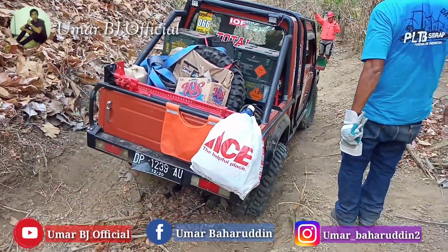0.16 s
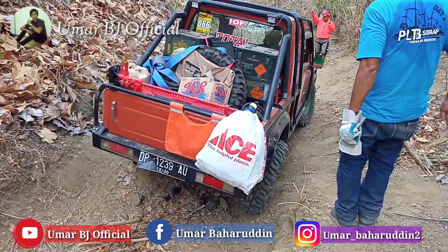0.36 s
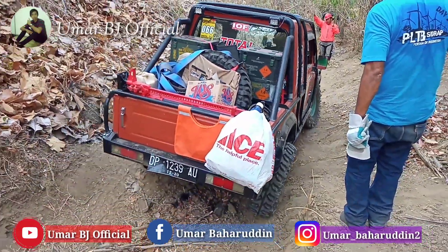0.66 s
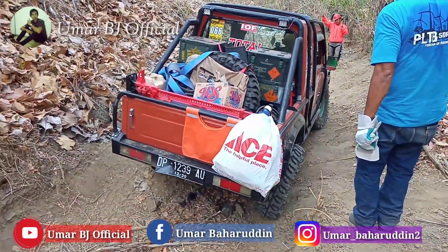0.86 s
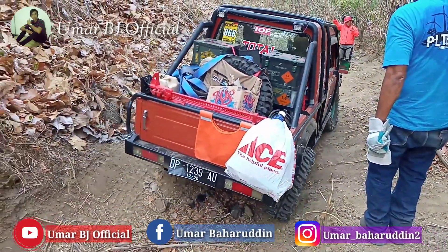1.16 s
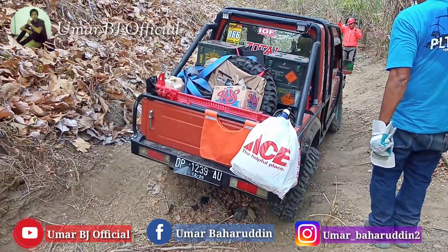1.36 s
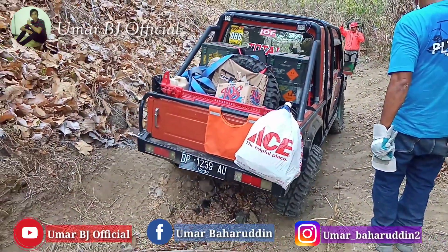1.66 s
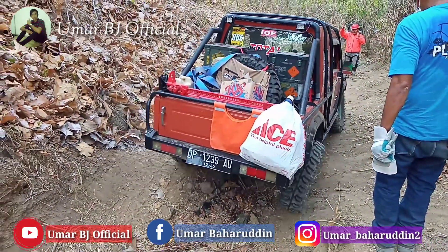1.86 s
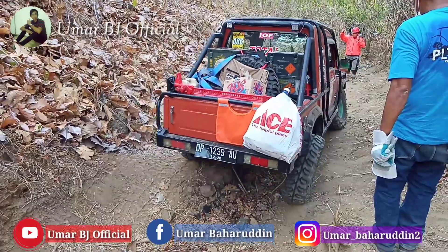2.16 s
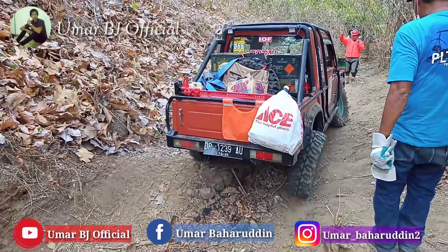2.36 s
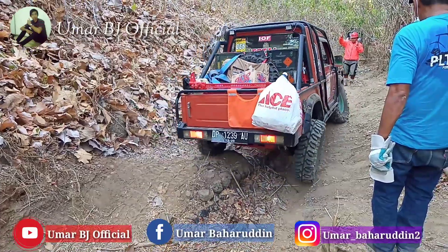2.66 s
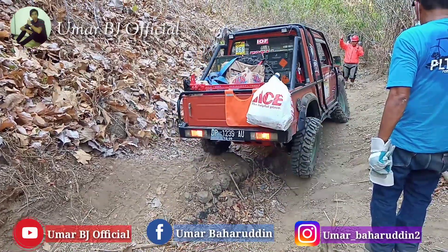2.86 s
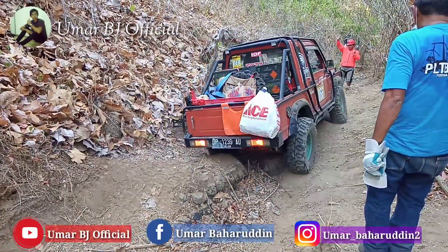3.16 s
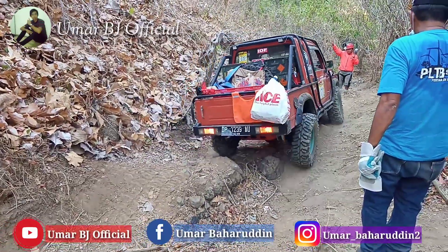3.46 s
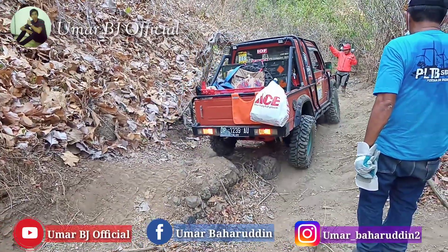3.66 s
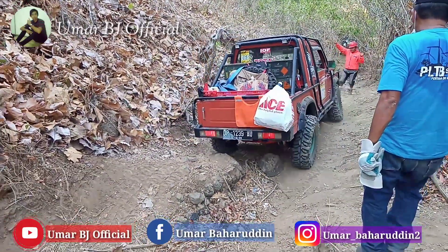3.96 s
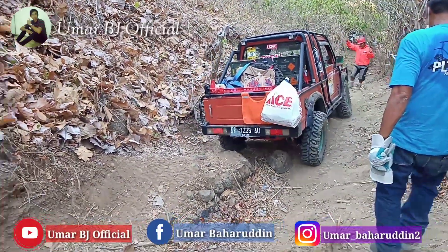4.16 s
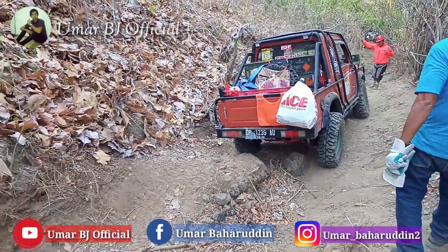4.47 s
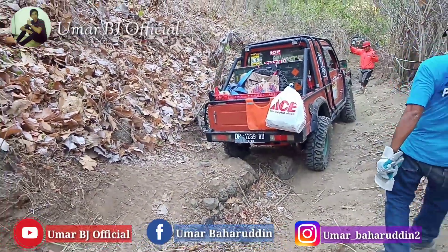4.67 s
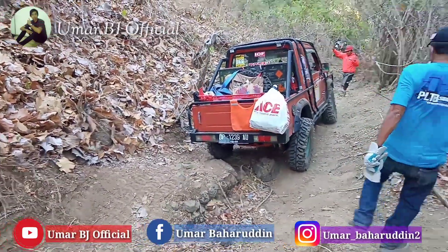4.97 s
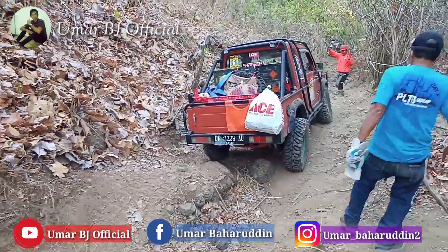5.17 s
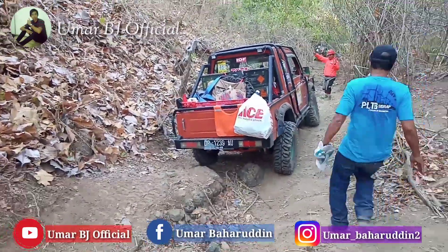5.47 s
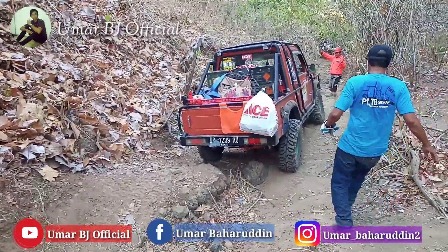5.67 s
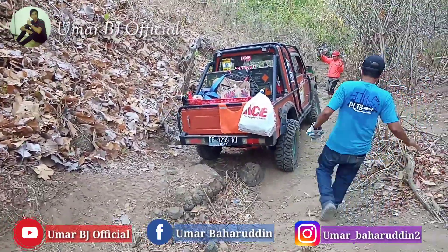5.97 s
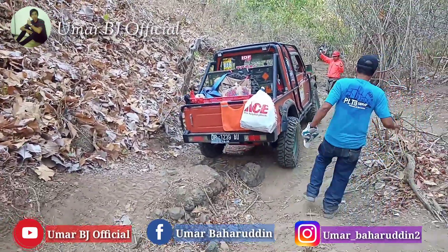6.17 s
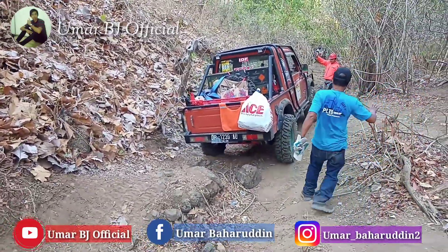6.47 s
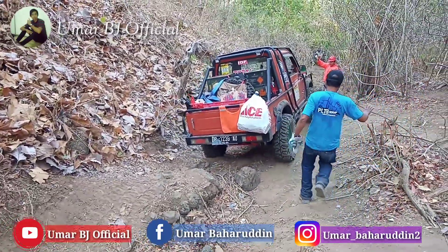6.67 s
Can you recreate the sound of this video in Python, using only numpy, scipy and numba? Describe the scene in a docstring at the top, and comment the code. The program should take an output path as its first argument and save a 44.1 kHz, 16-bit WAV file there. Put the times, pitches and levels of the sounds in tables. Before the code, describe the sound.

A small four-wheel-drive climbs a rocky dirt track, heard from a few metres behind. Its engine revs in a long surge with a booming, barking, slightly raspy exhaust. It then sinks to a labouring near-idle as the drivetrain gives a quick run of hard knocks and stones crack under the tyres. A few exhaust coughs lead into a second surge, a little farther away, which eases near the end.

```python
"""Off-roader on a rocky climb

A small four-cylinder climbs a dirt track, heard in mono from a few metres behind, beside a bank.
The throttle opens in two long surges: the exhaust booms in low tones, the firings ring the tailpipe
into a bark, and gas jets rasp. Between the surges the engine labours near idle, slack in the
drivetrain slams shut in a run of hard knocks, and stones crack under the tyres."""
import sys
import numpy as np
from scipy import signal
from scipy.fft import rfft, irfft
from scipy.io import wavfile
from scipy.ndimage import uniform_filter1d
from numba import njit

SR = 44100
rng = np.random.default_rng(int(sys.argv[2]) if len(sys.argv) > 2 else 0)


def dump(signal):
    """Clip the signal to [-1, 1] and save it as 16-bit WAV at the path in sys.argv[1]."""
    limited = np.clip(np.atleast_2d(signal).T, -1, 1)
    pcm = np.round(limited * 32767).astype(np.int16)
    wavfile.write(sys.argv[1], SR, pcm)


N = 300881
TIME = np.arange(N) / SR


def from_db(db):
    return 10 ** (np.asarray(db) / 20)


def rms_one(x):
    return x / np.sqrt(np.mean(x ** 2) + 1e-20)


def in_time(rows):
    """A two-column curve, read at every sample."""
    return np.interp(TIME, *np.transpose(rows))


def evened(x, size=5000):
    """Running level held at 1, so that an envelope can set it."""
    return x / np.sqrt(uniform_filter1d(uniform_filter1d(x ** 2, size), size) + 1e-12)


def filtered(x, order, hz, kind="low"):
    return signal.sosfilt(signal.butter(order, hz, kind, fs=SR, output="sos"), x)


def delayed(x, lag_s):
    return np.interp(TIME - lag_s, TIME, x, left=0)


def clicks(times, heights):
    """Single impulses at given moments."""
    samples = np.round(np.asarray(times) * SR).astype(int)
    return np.bincount(np.clip(samples, 0, N - 1), heights, N)


def fade(hits, decay_s):
    """Envelope that jumps at each hit and dies away."""
    return signal.lfilter([1], [1, -np.exp(-1 / (decay_s * SR))], hits + 1e-18)


def lagged(x, lag_s):
    """A control that follows its input with some inertia."""
    return x[0] + (1 - np.exp(-1 / (lag_s * SR))) * fade(x - x[0], lag_s)


def drift(rate_hz, step=40):
    """Smooth random wander of spread 1."""
    r = np.exp(-2 * np.pi * step * rate_hz / SR)
    slow = signal.lfilter([1], [1, -2 * r, r * r], rng.standard_normal(N // step + 2002))[2000:]
    return np.interp(np.arange(N) / step, np.arange(len(slow)), rms_one(slow))


def noise(spectrum, envelope=1, size=4096):
    """White noise under an envelope, coloured by a causal filter that keeps its level."""
    hz, db = np.transpose(spectrum)
    grid = np.maximum(np.fft.rfftfreq(size, 1 / SR), 1)
    gain = from_db(np.interp(np.log(grid), np.log(hz), db))
    cepstrum = irfft(np.log(gain))
    response = irfft(np.exp(rfft(2 * cepstrum[:size // 2], size)))
    white = envelope * rng.standard_normal(N)
    return signal.fftconvolve(white, response / np.linalg.norm(response))[:N]


def resonate(x, hz, width_hz):
    """A resonance with gain 1 at its peak."""
    r = np.exp(-np.pi * width_hz / SR)
    poles = [1, -2 * r * np.cos(2 * np.pi * hz / SR), r * r]
    return signal.lfilter(np.array([1, 0, -1]) * (1 - r * r) / 2, poles, x + 1e-18)


@njit
def moving_resonance(x, hz, width_hz):
    """Two-pole resonance whose pitch may change at every sample."""
    r = np.exp(-np.pi * width_hz / SR)
    turn = 2 * np.pi * hz / SR
    y = np.zeros(len(x))
    for i in range(2, len(x)):
        y[i] = x[i] - x[i - 2] + 2 * r * np.cos(turn[i]) * y[i - 1] - r * r * y[i - 2]
    return y


def ringing(drive, modes):
    """Parallel resonances of alternating sign, at level 1."""
    return evened(sum((-1) ** k * from_db(db) * resonate(drive, hz, width)
                      for k, (hz, width, db) in enumerate(modes)))


def swell(hits, hz, rise_s):
    """Each hit starts a swing that builds up and dies away."""
    t = TIME[:SR // 4]
    age = (t / rise_s) ** 2
    return signal.fftconvolve(hits, age * np.exp(1 - age) * np.sin(2 * np.pi * hz * t))[:N]


def puffs(pulses, rough, puff_s):
    """Each firing trails a short turbulent puff."""
    return pulses + rough * fade(pulses, puff_s) * rng.standard_normal(N)


def bank_echoes(x, echo_db=-12.5, dull_hz=3000):
    """The direct sound reaches the microphone, then three dull echoes from the bank by the track."""
    dull = filtered(x, 1, dull_hz)
    return x + from_db(echo_db) * sum(delayed(dull, lag_s) for lag_s in (.0073, .0168, .029))


# Colour of hard contact, for stones and drivetrain alike: frequency_hz, level_db
CONTACT_COLOUR = [(30, -38), (200, 20.5), (450, 4.5), (900, 1.5), (1450, 1), (2100, -8), (2900, -5.5),
                  (3800, -5.5), (4300, -15.5), (5300, -31), (6400, -27), (8400, -40), (10500, -53.5),
                  (15500, -60)]
# Grit shifting on the track as the tyres creep: time_s, level_db
GRIT_LEVEL = [(0, -62), (2.0, -57), (2.5, -49), (2.9, -47), (3.3, -44), (3.7, -50), (4.2, -62)]
# Stones cracking under the tyres: start_s, level_db
STONE_CRACKS = [(3.058, -19.5), (3.19, -17.5), (3.23, -18.5), (3.254, -38), (3.349, -25), (3.493, -23.5),
                (3.553, -21.5), (3.969, -34), (5.325, -18)]


def stones(grains_per_s=220, crack_db=-3, thin_hz=1500, ring_hz=1750, ring_db=-8):
    """Down on the track, stones crack with a brief ring amid a scatter of grit."""
    start_s, level_db = np.transpose(STONE_CRACKS)
    grains = (rng.random(N) < grains_per_s / SR) * from_db(2 * np.minimum(rng.exponential(1, N), 3))
    grit = rms_one(fade(grains, decay_s=.0085)) * from_db(in_time(GRIT_LEVEL))
    hits = clicks(start_s, from_db(level_db + crack_db))
    cracks = filtered(noise(CONTACT_COLOUR, fade(hits, decay_s=.026)), 1, thin_hz, "high")
    ring = from_db(ring_db) * resonate(cracks, ring_hz, width_hz=400)
    return noise(CONTACT_COLOUR, grit) + cracks + ring


# Colour of the valve gear's clatter: frequency_hz, level_db
CLATTER_COLOUR = [(300, 6), (700, 13), (1100, 0.5), (1600, -1.5), (2200, -7), (2700, -5), (3150, 0),
                  (3850, -1.5), (4200, -11), (4800, -18.5), (5300, -27), (8200, -31), (10000, -44.5),
                  (15500, -45.5)]


def engine_bay(throttle, climbed, clatter_db=3.5, whine_hz=3770, width_hz=130):
    """Valve gear clatters as a flickering noise under a thin whine; both grow with the throttle."""
    level_db = -39.5 + 7.5 * throttle ** 2 - climbed
    whine_db = -12 + 4 * climbed
    narrow = resonate(rng.standard_normal(N), whine_hz, width_hz)
    whine = rms_one(resonate(narrow, whine_hz, width_hz))
    flicker = rms_one(from_db(1.4 * drift(45)))
    clatter = noise(CLATTER_COLOUR, flicker * from_db(level_db + clatter_db))
    return clatter + from_db(level_db + whine_db) * whine


# Drivetrain knocks between the surges: start_s, thud_db, clack_db
DRIVETRAIN_KNOCKS = [(2.054, -14, -33), (2.114, -12, -27), (2.177, -20, -37), (2.233, -12, -30),
                     (2.298, -6, -25), (2.357, -10, -20), (2.409, -5, -22), (2.462, -5, -16),
                     (2.515, -8, -20), (2.585, -4.5, -19), (2.641, -3.5, -20), (2.704, -2.5, -17),
                     (2.744, -4.5, -24), (2.771, -11, -24)]
# Low swings of the chassis: pitch_hz, level_db, rise_s
CHASSIS_MODES = [(274, -1, .014), (246, -17, .018), (318, -18, .011)]
# Metal ring of the drivetrain: pitch_hz, width_hz, level_db
DRIVETRAIN_MODES = [(930, 32, -14.5), (1230, 68, -7), (1550, 34, -22), (1884, 6.7, 5), (3130, 110, -17),
                    (3760, 120, -24)]


def judder(clack_s=.024, rattle_db=-35, rattle_s=.07, ring_db=-27):
    """Drivetrain slack slams shut again and again: a ringing metal clack, then the chassis swings."""
    start_s, thud_db, clack_db = np.transpose(DRIVETRAIN_KNOCKS)
    thuds = clicks(start_s, from_db(thud_db + .5))
    body = sum(from_db(db) * swell(thuds, hz, rise_s) for hz, db, rise_s in CHASSIS_MODES)
    hits = clicks(start_s, from_db(clack_db + 3.5))
    envelope = fade(hits, clack_s) + from_db(rattle_db) * fade(hits, rattle_s)
    contact = noise(CONTACT_COLOUR, from_db(2 * drift(220)) * envelope)
    ring = sum(from_db(db) * resonate(hits, hz, width) * SR / (2 * np.pi * width)
               for hz, width, db in DRIVETRAIN_MODES)
    return body + contact + from_db(ring_db) * ring


# Exhaust coughs as the throttle moves: start_s, level_db
EXHAUST_COUGHS = [(0.588, -19), (3.91, -11), (4.078, -14), (4.867, -16), (4.925, -10.5), (4.972, -18),
                  (5.035, -6.5), (5.11, -17)]


def coughs(ring_hz=130, rise_s=.019):
    """Single strong firings ring the silencer."""
    start_s, level_db = np.transpose(EXHAUST_COUGHS)
    return swell(clicks(start_s, from_db(level_db)), ring_hz, rise_s)


# The driver's pedal presses: down_s, up_s, opening_share, snarl_hz, hardness_db
PEDAL_PRESSES = [(0.024, 0.215, 0.26, 684, 0.1), (0.588, 0.962, 0.92, 664, -1.2),
                 (0.973, 1.185, 0.75, 632, -1.8), (1.198, 1.335, 0.68, 670, -2),
                 (1.32, 1.797, .74, 697, 0.5), (1.767, 1.973, 0.81, 794, 4), (4.85, 4.934, 0.44, 645, -5.5),
                 (5.02, 5.085, 0.95, 650, -6.5), (5.09, 5.189, 0.69, 650, -3),
                 (5.185, 5.982, 0.87, 664, 0.4), (5.987, 6.127, 0.48, 634, 0.8), (6.12, 6.52, 0.31, 597, 1)]


def pedal(open_s=.016, shut_s=.053, idle_snarl_hz=664.0, glide_s=.05):
    """Throttle (quick to open, slower to shut), main pipe resonance and hardness of tone."""
    opening, snarl_hz, hard_db = np.zeros(N), np.full(N, idle_snarl_hz), np.zeros(N)
    for down_s, up_s, share, hz, db in PEDAL_PRESSES:
        held = (TIME >= down_s) & (TIME < up_s)
        opening[held], snarl_hz[held], hard_db[held] = share, hz, db
    throttle = np.maximum(lagged(opening, open_s), lagged(opening, shut_s))
    # the tone lags as gas heat and flow change
    return np.maximum(throttle, 0), lagged(snarl_hz, glide_s), lagged(hard_db, glide_s)


# The four cylinders in firing order: phase_cycles, level_db
FIRING_ORDER = [(.005, 9), (.245, 11.5), (.495, 5), (0.75, 7.5)]


def firings(cycle, idling, scatter_db=.6, jitter_s=.00002):
    """One impulse per firing; cylinders differ, and burn less evenly at low speed."""
    phase, level_db = np.transpose(FIRING_ORDER)
    turns = np.arange(int(cycle[-1]) + 1)
    times = np.interp((turns[:, None] + phase).ravel(), cycle, TIME)
    uneven = 1 + np.interp(times, TIME, idling)
    late, strong = uneven * rng.standard_normal((len(times), 2)).T
    heights = from_db(np.tile(level_db, len(turns)) + scatter_db * strong)
    return clicks(times + jitter_s * late, (times < TIME[-1]) * heights)


# Colour of the gas jets at the tailpipe: frequency_hz, level_db
JET_COLOUR = [(900, -9), (1400, -19.5), (1850, 10), (2200, -40), (2800, 1), (3700, -8), (4300, -7.5),
              (5300, -9), (6800, -12), (8400, -14.5), (9400, -27), (12000, -38.5), (14000, -38),
              (15500, -51)]
# Silencer's sheet metal, close by and from up the slope: pitch_hz, width_hz, near_db, far_db
SHELL_MODES = [(1796, 52, 4, -1.5), (2622, 48, -0.5, 6), (2947, 37, 4, 6.5), (3530, 88, 6, 0.5),
               (3800, 230, -4.5, -3.5), (4620, 37, -0.5, -27), (4950, 110, -14, -12),
               (5820, 120, -20, -12.5), (6340, 110, -12, -12.5), (7220, 59, -11, -11.5),
               (8200, 100, -19.5, -12)]


def rasp(cycle, pulses, throttle, climbed, settle_s=.2, tube_hz=720, hiss_db=-6, top_hz=8500):
    """With the throttle open, gas jets hiss through the hollow tailpipe and the silencer shell rings."""
    snap = np.maximum(throttle - lagged(throttle, settle_s), 0)   # flares until the flow settles
    level = from_db(-63.5) + from_db(-37.5 + 9 * snap) * throttle ** 2.4
    pulsing_db = 4.5 * np.cos(8 * np.pi * (cycle - .17))   # four swells a cycle
    jet = noise(JET_COLOUR, level * rms_one(from_db(pulsing_db + 3.5 * drift(45))))
    hollow = jet + .4 * delayed(jet, 1 / tube_hz) + .2 * delayed(jet, 2 / tube_hz)
    # each mode radiates its own way, so the ring at the microphone changes as the vehicle moves
    modes = [(hz, width, near + (far - near) * climbed) for hz, width, near, far in SHELL_MODES]
    shell = level * ringing(puffs(pulses, rough=.04, puff_s=.003), modes)
    return from_db(hiss_db) * hollow + filtered(delayed(shell, .004), 8, top_hz)


# Lower tailpipe resonances: pitch_hz, width_hz, level_db
LOWER_PIPE_MODES = [(375, 40, -11), (482, 40, -8), (600, 60, -5), (750, 50, 0)]
# Upper tailpipe resonances: pitch_hz, width_hz, level_db
UPPER_PIPE_MODES = [(883, 5.6, 7), (940, 80, 4.5), (1057.4, 22.3, 0.5), (1248, 51, -31), (1430, 43, -15)]


def bark(cycle, pulses, speed, throttle, climbed, snarl_hz, idle_speed=18, tuned_speed=22.02,
         lope_db=6, band_hz=(300, 1700)):
    """Firings ring the tailpipe; its main resonance snarls hardest when they are in tune with it."""
    drive = puffs(pulses, rough=.012, puff_s=.005)
    tuned = np.exp(-((speed - tuned_speed) / .9) ** 2)
    lope = from_db(lope_db * np.cos(2 * np.pi * (cycle - .13 + .23 * tuned)))   # one swell a cycle
    snarl = from_db(-2.5 + 3.5 * tuned) * evened(lope * moving_resonance(drive, snarl_hz, width_hz=55))
    lower = from_db(-3 - tuned) * ringing(drive, LOWER_PIPE_MODES)
    upper = from_db(-20 + 10 * throttle + 6.5 * climbed) * ringing(drive, UPPER_PIPE_MODES)
    load_db = throttle * (10 + 1.3154 * (speed - idle_speed))
    level_db = -33.5 + load_db - 9 * climbed   # fainter from up the slope
    return from_db(level_db) * filtered(lower + snarl + upper, 2, band_hz, "band")


def boom_level(speed, throttle, build_speed=20, drag_s=.13):
    """The boom's level in dB grows with speed, with throttle and as each knock drags on the engine."""
    start_s, thud_db, _ = np.transpose(DRIVETRAIN_KNOCKS)
    drag_db = lagged(fade(clicks(start_s, from_db(thud_db) ** 2), drag_s), lag_s=.053)
    return -23.5 + 1.85 * np.maximum(speed - build_speed, 0) + 8 * throttle ** 2 + drag_db


# Five engine speeds, from labouring to surging: cycles_per_s
BOOM_SPEEDS = [17.3, 18.3, 20, 22.8, 24.6]
# Low exhaust tones: multiple_of_cycle_rate, then level_db at each of the BOOM_SPEEDS
BOOM_ORDERS = [(4, -10.5, -1.5, 0, -4, 0.5), (5, -8.5, 2, -0.5, -13.5, -7.5),
               (6, -16.5, -22, -44.5, -18, -35.5), (7, -7, 5.5, -7, -29.5, -34.5),
               (8, 1, 6.5, -8.5, -12.5, -6), (9, -26, -18.5, -5, -11, -23),
               (10, -15.5, -0.5, -11.5, -31.5, -47.5), (11, 0.5, -6.5, -12.5, -34.5, -55),
               (12, -12.5, -16.5, -22, -25.5, -31.5), (13, -15.5, -29.5, -27, -37, -32),
               (16, -20, -36.5, -33, -21.5, -18.5), (20, -15.5, -18, -10.5, -21.5, -22.5)]
# Colour of the rumble under the tones: frequency_hz, level_db
RUMBLE_COLOUR = [(20, -48), (45, -28), (65, -13), (90, -5.5), (130, 26), (190, 28.5), (260, 12),
                 (400, -38.5)]


def boom(cycle, speed, throttle, idling, coast_db_per_octave=-11):
    """Low tones leave the silencer and beat into a throb over a rumble; coasting dulls them."""
    coasting = (1 - idling) * np.clip(1 - throttle / .38, 0, 1)   # fast, with the throttle nearly shut
    tones = np.zeros(N)
    for order, *levels_db in BOOM_ORDERS:
        waver_db = (.6 + .9 * idling) * drift(7)
        waver_phase = (.05 + .17 * idling) * drift(7)
        coast_db = coast_db_per_octave * coasting * np.log2(order / 4)
        level_db = np.interp(speed, BOOM_SPEEDS, levels_db) + waver_db + coast_db
        # the silencer spreads each pulse in time
        smear = (.2247 + .13 * idling * (order < 12)) * (order - 6) ** 2
        tones += from_db(level_db) * np.sin(2 * np.pi * order * (cycle - .62) + smear + waver_phase)
    rumble = from_db(-22 + 5.9 * idling) * noise(RUMBLE_COLOUR)
    return from_db(boom_level(speed, throttle)) * (evened(tones) + rumble)


# Engine speed, with four firings to each four-stroke cycle: time_s, cycles_per_s
ENGINE_SPEED = [(0.0, 17.12), (0.62, 17.7), (0.79, 21.38), (0.99, 23.24), (1.4, 20.23), (1.74, 19.78),
                (2.01, 21.07), (2.17, 19.41), (2.81, 17.22), (3.5, 18.32), (4.09, 17.9), (4.58, 18.84),
                (5.09, 18.33), (5.39, 23.05), (5.56, 24.5), (5.95, 24.72), (6.2, 23.44), (6.58, 24.95),
                (6.82, 23.39)]
# The way up the slope, away from the microphone: time_s, climbed_share
SLOPE_PROGRESS = [(1.9, 0), (3.2, 1)]


def scene():
    """From behind the vehicle: exhaust and engine bay follow the climb; knocks and stones come on top."""
    speed, climbed = in_time(ENGINE_SPEED), in_time(SLOPE_PROGRESS)
    throttle, snarl_hz, hard_db = pedal()
    hardness = from_db(hard_db)   # more bark, less boom
    cycle = np.cumsum(speed) / SR
    idling = np.clip(21.5 - speed, 0, 1)
    pulses = firings(cycle, idling)
    low = boom(cycle, speed, throttle, idling) / hardness
    pipe = hardness * bark(cycle, pulses, speed, throttle, climbed, snarl_hz)
    bright = pipe + rasp(cycle, pulses, throttle, climbed) + engine_bay(throttle, climbed) + stones()
    return (low + coughs() + judder() + bank_echoes(bright))[None]


def record(dry, ceiling=.92, cutoff_hz=15760):
    """One microphone channel, with the highest peaks rounded and the top treble cut."""
    rounded = dry / (1 + (dry / ceiling) ** 8) ** (1 / 8)
    return signal.sosfilt(signal.cheby2(12, 70, cutoff_hz, fs=SR, output="sos"), rounded)


dry = scene()
out = record(dry)
dump(out)
```